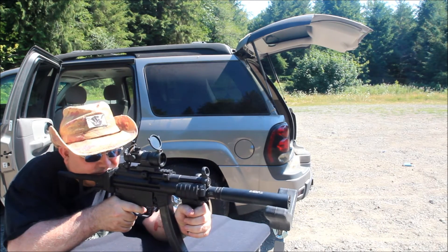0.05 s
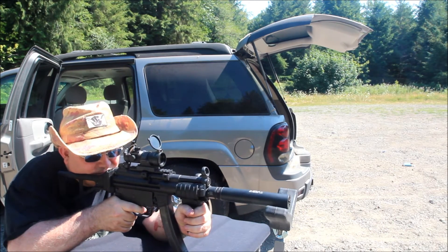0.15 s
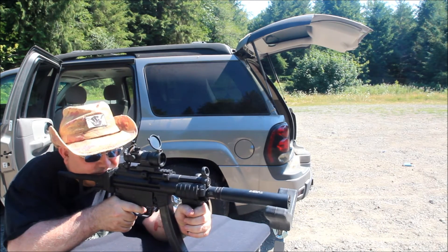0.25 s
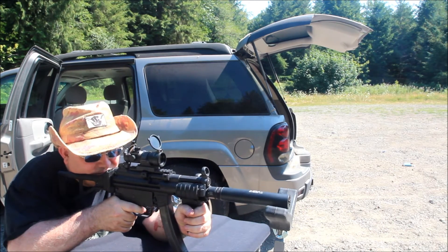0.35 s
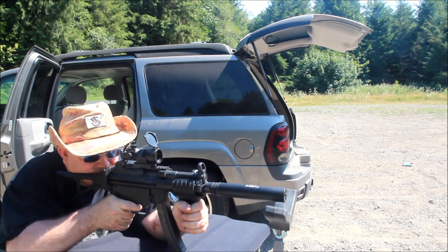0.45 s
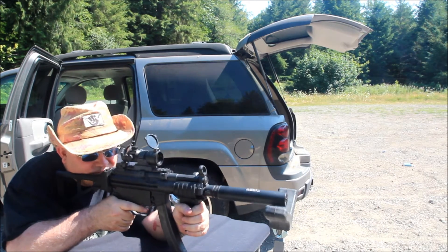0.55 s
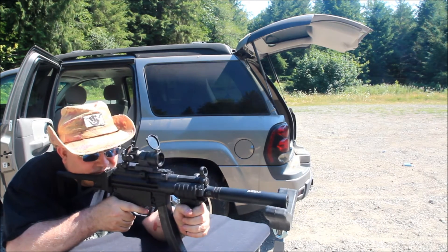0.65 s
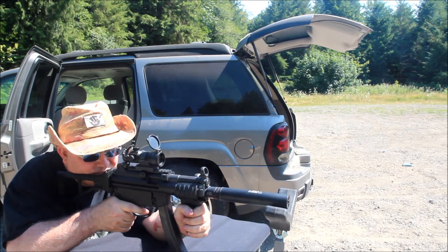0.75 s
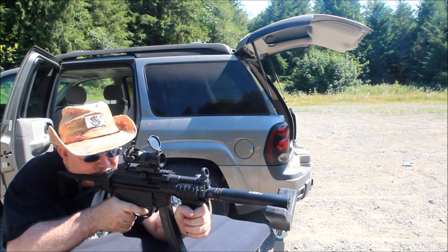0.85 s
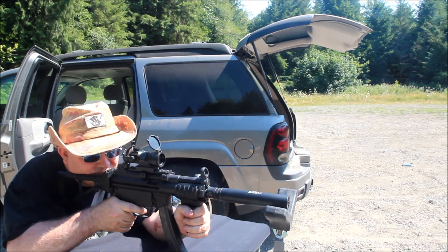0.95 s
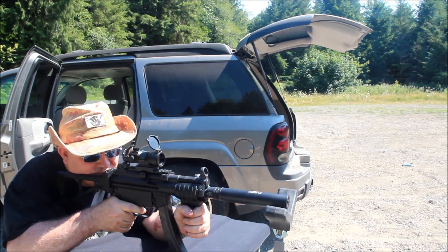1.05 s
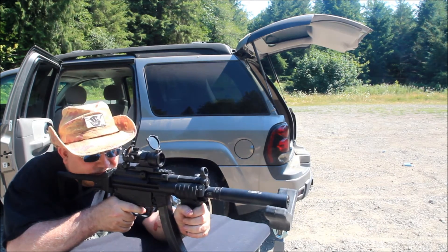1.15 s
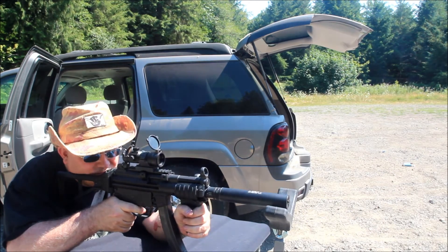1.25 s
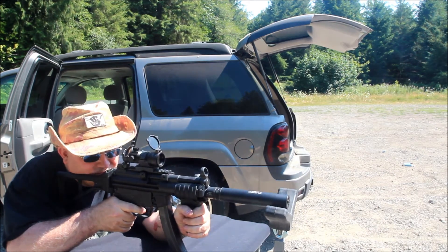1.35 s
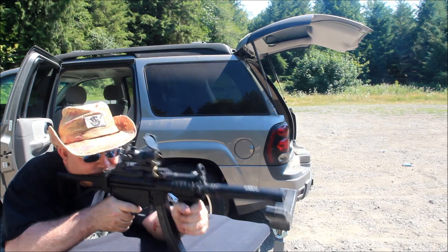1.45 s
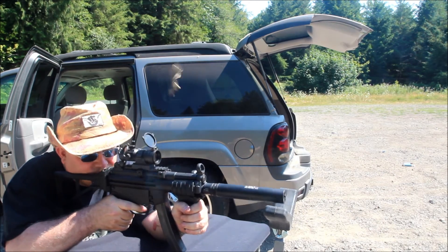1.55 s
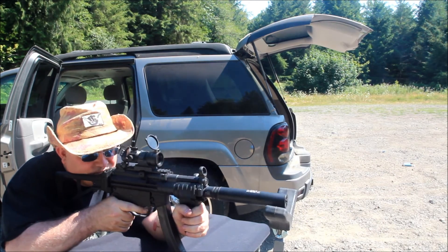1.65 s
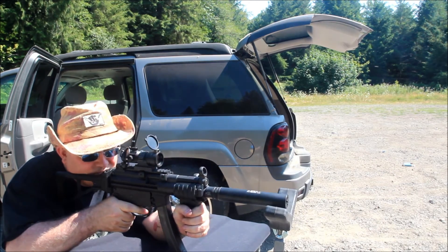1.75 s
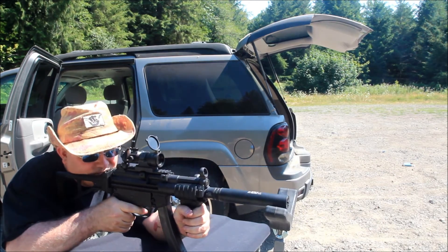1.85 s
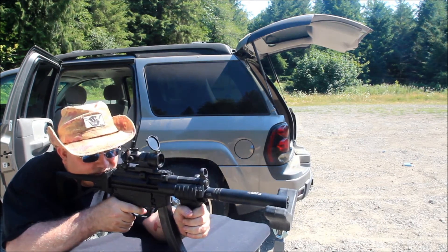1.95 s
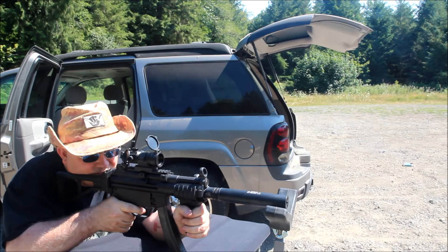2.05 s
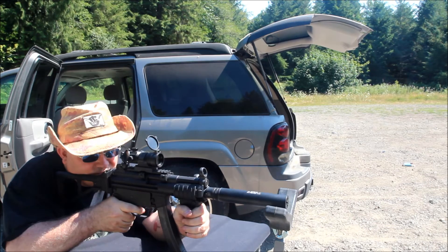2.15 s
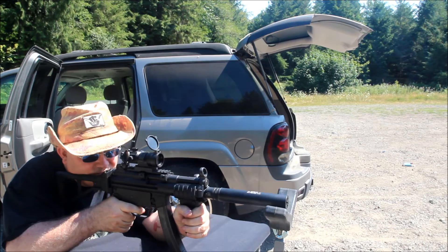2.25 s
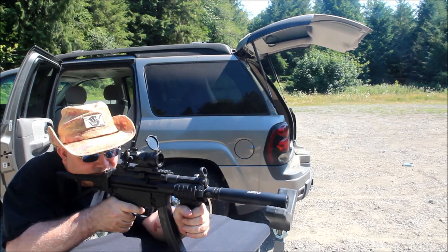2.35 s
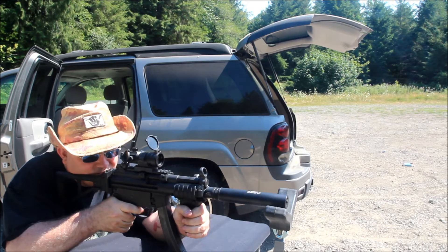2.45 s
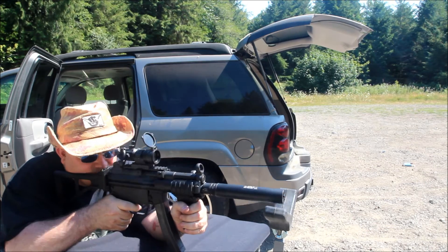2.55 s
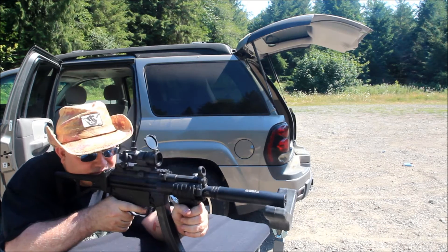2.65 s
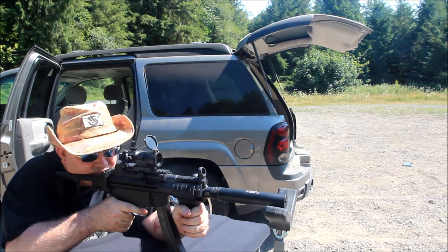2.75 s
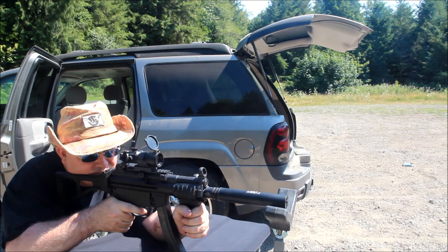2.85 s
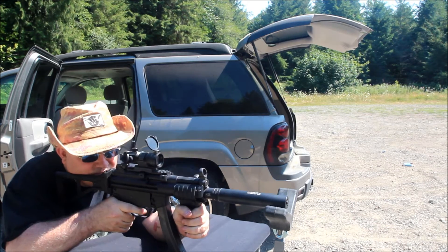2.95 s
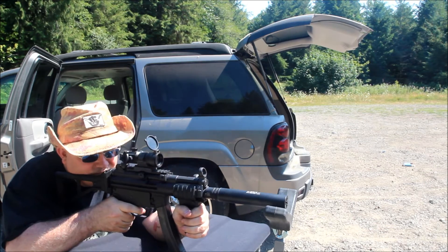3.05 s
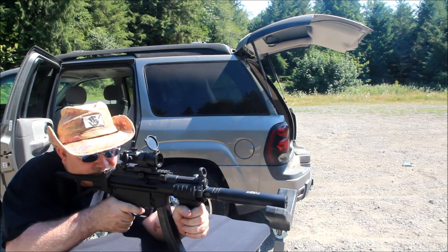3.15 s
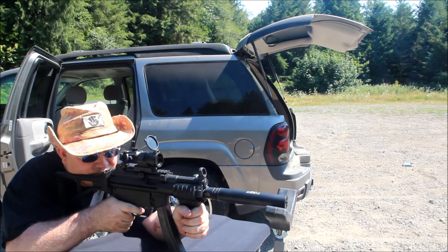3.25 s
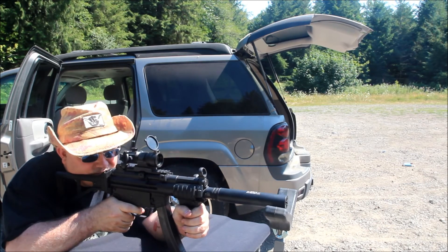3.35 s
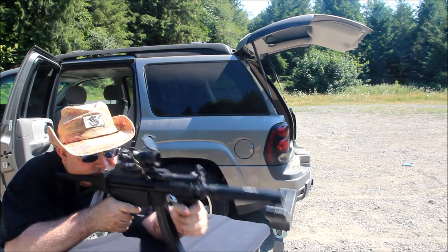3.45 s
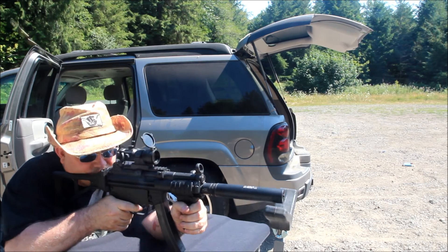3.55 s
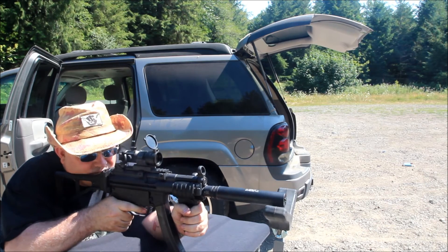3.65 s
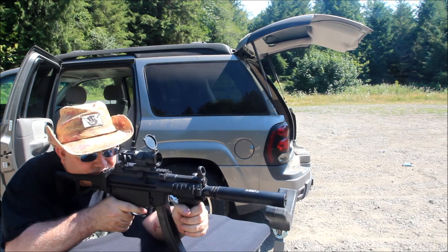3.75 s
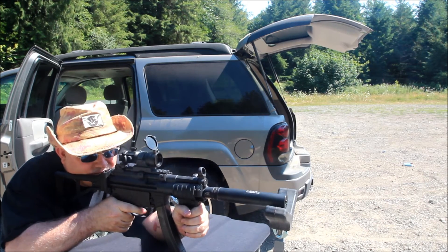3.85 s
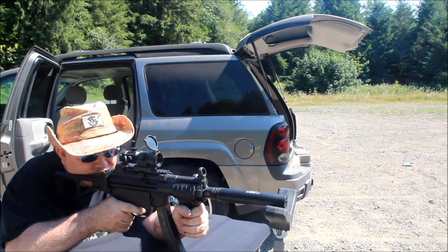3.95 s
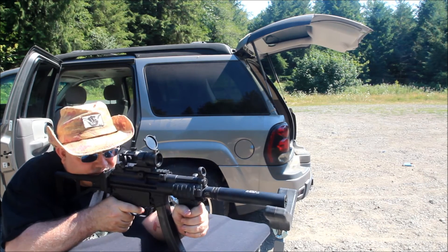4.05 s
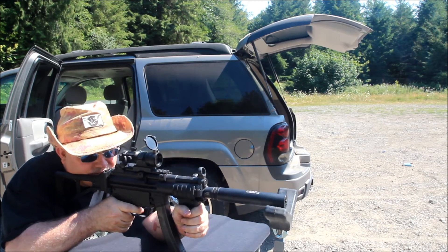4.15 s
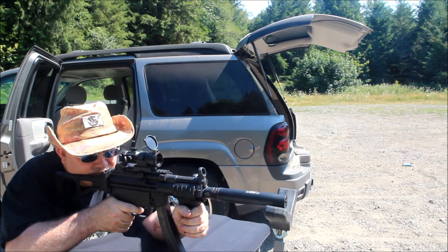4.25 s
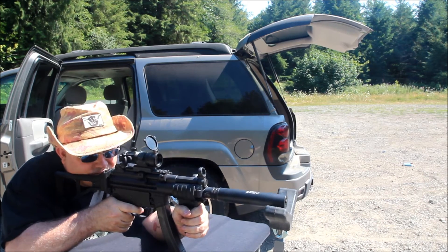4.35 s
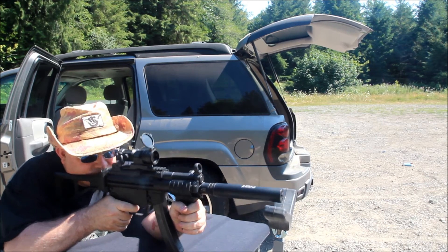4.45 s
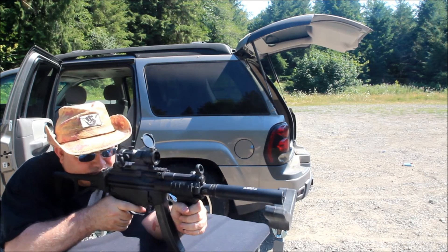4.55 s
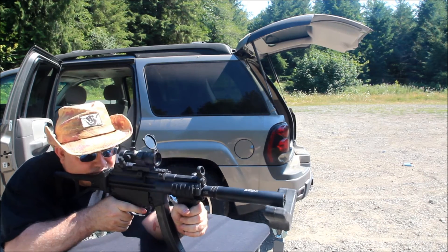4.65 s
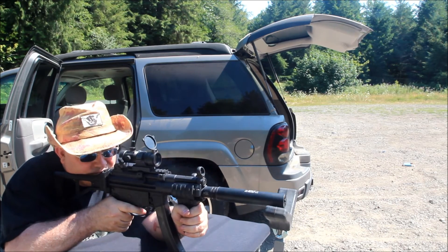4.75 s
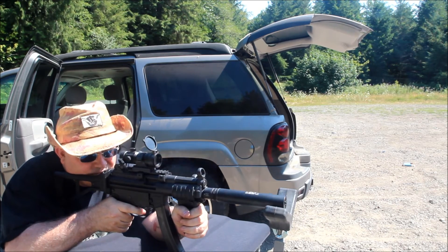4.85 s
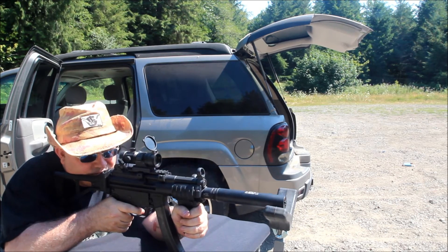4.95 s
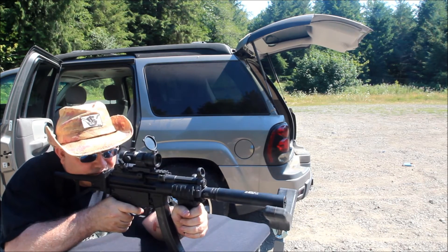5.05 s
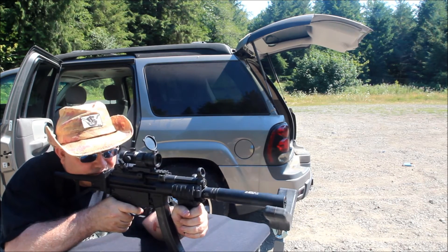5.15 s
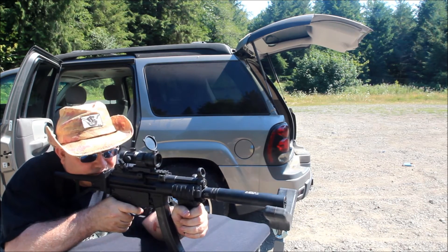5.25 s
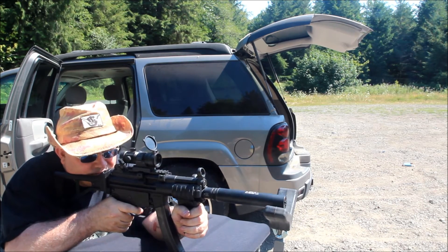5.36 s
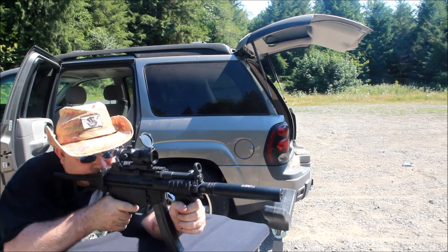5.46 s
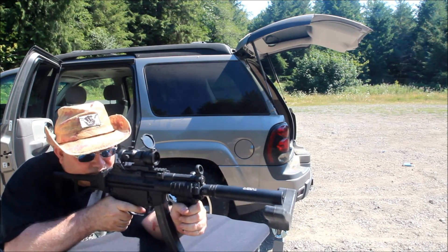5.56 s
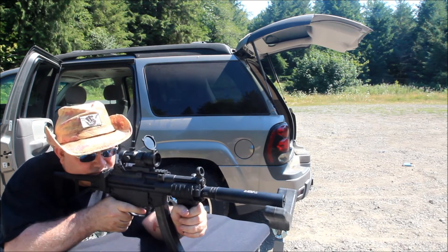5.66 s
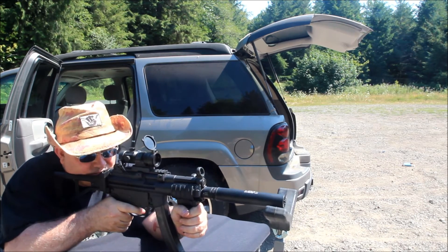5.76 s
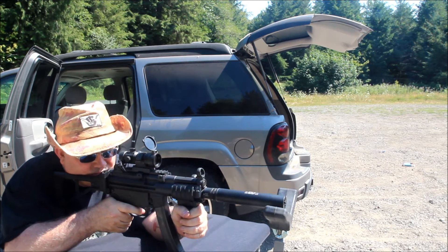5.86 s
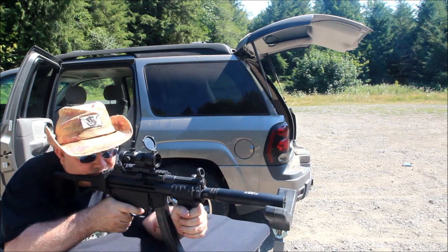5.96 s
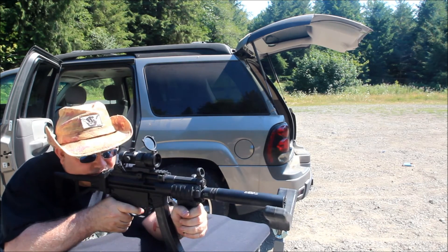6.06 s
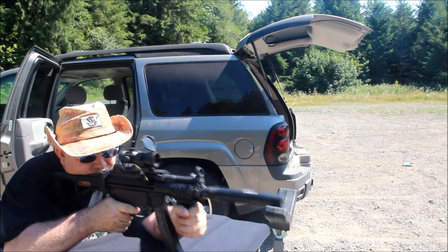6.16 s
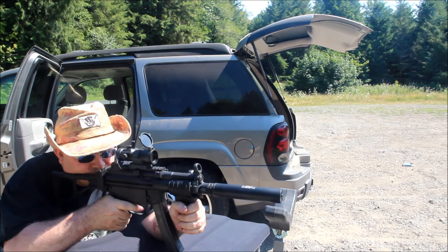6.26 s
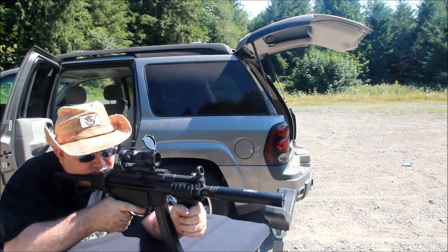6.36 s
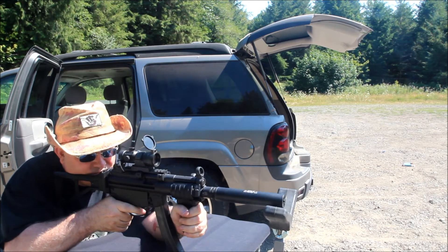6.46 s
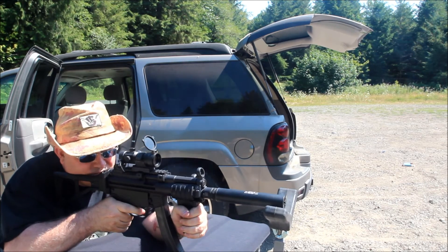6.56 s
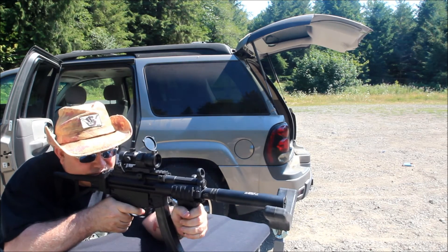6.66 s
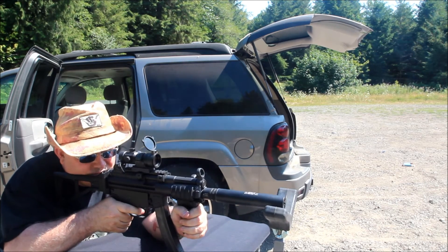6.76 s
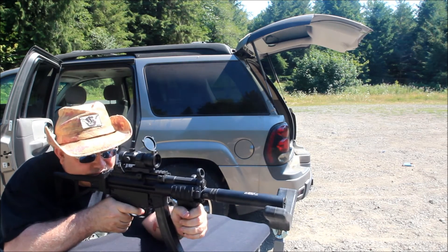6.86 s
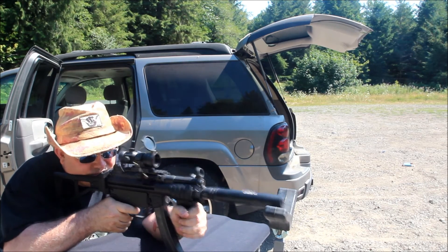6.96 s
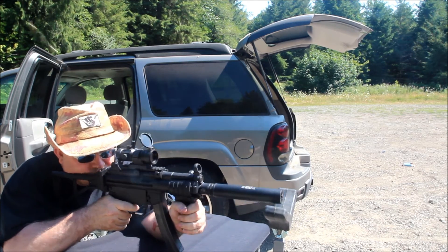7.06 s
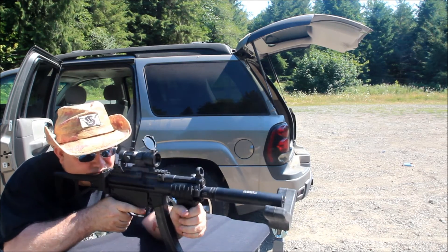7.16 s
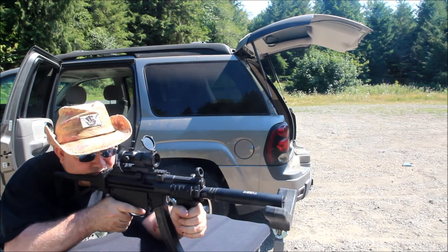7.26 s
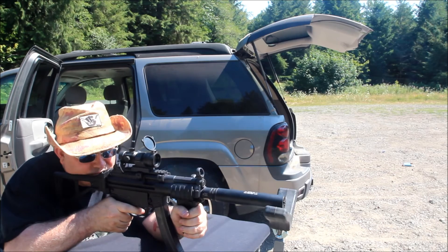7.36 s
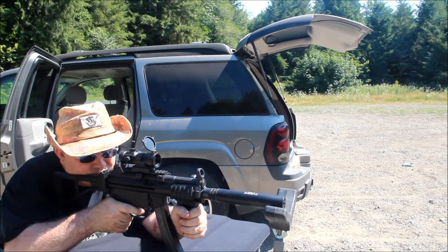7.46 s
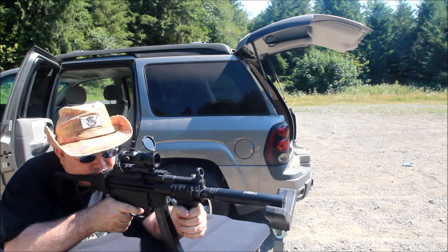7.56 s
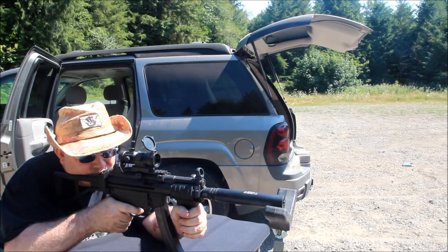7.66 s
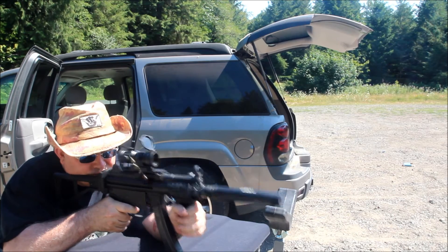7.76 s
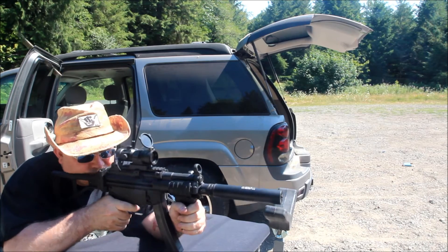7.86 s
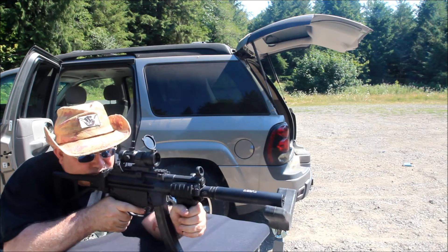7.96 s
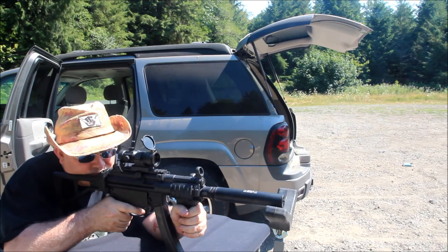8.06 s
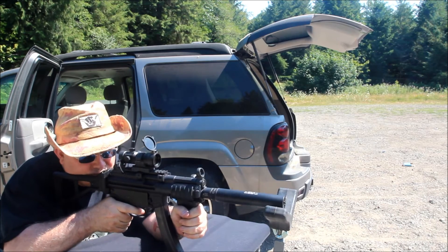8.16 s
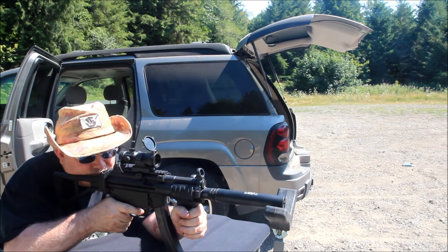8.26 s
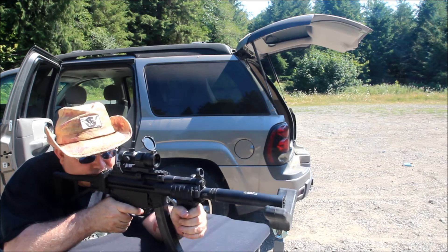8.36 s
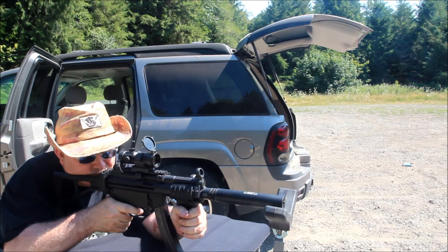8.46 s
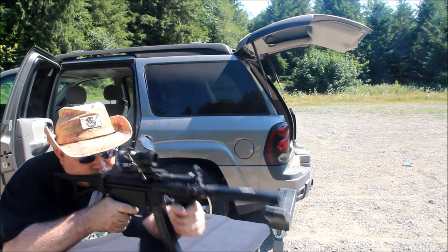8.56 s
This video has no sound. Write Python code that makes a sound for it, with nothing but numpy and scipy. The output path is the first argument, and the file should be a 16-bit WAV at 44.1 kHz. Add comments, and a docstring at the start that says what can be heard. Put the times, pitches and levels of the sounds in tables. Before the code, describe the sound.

A suppressed submachine gun fires nine steady single shots outdoors, each a sharp puff and bolt clack, with trigger clicks and faint tinkling brass.

```python
"""Nine single shots from a suppressed submachine gun on an outdoor gravel range, close to a small camera.
Over a soft hiss the gun knocks, clicks and rings thinly as it is handled. In each shot the hammer
clacks, gas puffs from the muzzle and the bolt slams shut. The puff overloads the camera, which turns
itself down and slowly back up. Then the trigger resets, the bullet lands far off and the trees answer.
Just before the fourth shot a piece of steel pings. Later, spent brass cases tinkle on the gravel."""
import sys
import numpy as np
from scipy import signal
from scipy.fft import rfft, irfft, next_fast_len
from scipy.io import wavfile
from scipy.ndimage import uniform_filter1d

SR = 44100
rng = np.random.default_rng(int(sys.argv[2]) if len(sys.argv) > 2 else 0)


def master(y):
    """Save y as 16-bit WAV."""
    cut = np.clip(np.atleast_2d(y).T, -1, 1)
    pcm = np.round(cut * 32767)  # scale
    wavfile.write(sys.argv[1], SR, pcm.astype(np.int16))


N = 379260

# the shots: puff t/s, hammer/dB, puff/dB, low thump/dB, wait until the bolt shuts/s, bolt/dB, echo/dB
SHOTS = [(.4835, 1.5, 14.5, 8.5, .0475, 8, -.5), (1.5287, 1, 12, 3, 0.048, 3.5, 1),
         (2.569, 1, 16, 10, 0.046, 9, -.5), (3.5378, -5.5, 14.5, -3.5, .0471, 4.5, .3),
         (4.5107, -1.5, 15, 6, 0.046, 7, -0.5), (5.5034, -3, 17.5, 6, 0.046, 9, -0.8),
         (6.2524, -1.5, 15, 0.5, 0.047, 4, 1), (7.0557, -1, 15.5, 3.5, .0472, 5, -0.8),
         (7.845, -1.5, 15.5, 6, 0.045, 6, -0.1)]


def from_db(db):
    """Turn decibels into a number to multiply by."""
    return np.exp(np.asarray(db) * (np.log(10) / 20))


def rms_one(x):
    """Scale a sound to an average power of 1."""
    return x / np.sqrt(np.mean(x ** 2) + 1e-20)


def times(size):
    """The time of each sample, in seconds."""
    return np.arange(size) / SR


def add(track, s, sound):
    """Mix a sound into a stereo track, s seconds in."""
    start = max(int(round(s * SR)), 0)
    piece = sound[..., :max(N - start, 0)]
    track[:, start:start + piece.shape[-1]] += piece


def decay(t, fade_s):
    """Die away. A fade time, here and in the tables, is how long a sound takes to fall 60 dB."""
    return np.exp(-np.log(1000) * t / fade_s)


def envelope(size, attack_s, fade_s, hold_s=0, ring_db=None, ring_fade_s=None):
    """Loudness that rises, holds and fades, with a weaker, longer ring if ring_db is given."""
    t = times(size)
    released = np.maximum(t - attack_s - hold_s, 0)
    gain = decay(released, fade_s)
    if ring_db is not None:
        gain = np.hypot(gain, from_db(ring_db) * decay(released, ring_fade_s))
    return np.minimum(t / attack_s, 1) ** 2 * gain / gain[0]


def colour_gain(colour, peaks, size):
    """How strong each frequency is: a broad curve (the colour) with narrow peaks on top."""
    hz = np.arange(size // 2 + 1) * SR / size
    colour_hz, colour_db = np.array(colour).T
    broad_db = np.interp(np.log(hz + 1), np.log(colour_hz), colour_db)
    peaks_db = sum(db / (1 + (2 * (hz - f) / width) ** 2) for f, width, db in peaks)
    return from_db(broad_db + peaks_db)


def coloured_noise(colour, peaks=(), size=8192, side_db=-29.5):
    """Noise with a given colour and peaks, nearly the same left and right."""
    gain = colour_gain(colour, peaks, size)
    phases = np.exp(2j * np.pi * rng.random((2, len(gain))))
    mid, side = irfft(gain * phases, size)
    return rms_one(mid) + from_db(side_db) * rms_one(side) * np.array([[1], [-1]])


def broad_outline(spectrum):
    """Smooth a spectrum so that only its overall shape is left."""
    power = uniform_filter1d(np.abs(spectrum) ** 2, size=91)
    return rms_one(np.sqrt(np.abs(power) + 1e-12))


def blow(colour, peaks, size=8192, **shape):
    """A short burst of noise that holds while the contact or the gas lasts, then drops fast."""
    spectrum = rfft(coloured_noise(colour, peaks, size) * envelope(size, **shape))
    # the same parts collide each time: the fine grain changes, the broad colour stays
    steady = broad_outline(colour_gain(colour, peaks, size))
    return irfft(spectrum * steady / broad_outline(spectrum[0]), size)[:, :size // 2]


def ring(tones, pitch=1):
    """The fading pure tones of something struck; each is f/Hz (times pitch), level/dB, fade/s."""
    t = times(12288)
    return sum(from_db(db) * decay(t, fade_s) * np.sin(2 * np.pi * hz * pitch * t)
               for hz, db, fade_s in tones)


def pressure_pulse(width_s, edge_hz):
    """A jump in air pressure that swings through zero and dies, softened above edge_hz."""
    widths = times(SR // 10) / width_s
    soften = signal.butter(2, edge_hz, fs=SR, output="sos")
    pulse = signal.sosfilt(soften, (1 - widths) * np.exp(-widths))
    return pulse / np.abs(pulse).max()


def low_cut(x, hz):
    """Thin out the bass, as small or distant things give off little of it."""
    return signal.sosfilt(signal.butter(2, hz, "high", fs=SR, output="sos"), x + 1e-18)


def outdoor_hiss():
    """The soft, steady noise of the open air."""
    colour = [(30, -16), (100, -5.5), (200, -2), (500, -1), (1000, -1.5), (1900, -5), (3500, -8.5),
              (6000, -16), (9000, -20.5), (15500, -24.5)]  # the hiss: f/Hz, level/dB
    peaks = [(1480, 390, 6)]  # a hump in it: f/Hz, width/Hz, boost/dB
    return from_db(-51) * coloured_noise(colour, peaks, size=next_fast_len(N, True))[:, :N]


def gun_knocks():
    """The gun bumps its rest: a pulse and a short, dull ring."""
    knocks = [(.110, -43), (.1152, -22), (1.4117, -29), (1.4162, -33), (1.418, -27), (2.3893, -15.5),
              (7.759, -31.5)]  # each bump: t/s, level/dB
    knock_ring = ring([(230.3, -20, .022), (424, -18, .022), (820, -10.5, .014), (1290, -4, .0073)])
    out = np.zeros((2, N))
    for s, db in knocks:
        add(out, s, from_db(db) * pressure_pulse(width_s=.00063, edge_hz=11000))
        add(out, s, from_db(db) * knock_ring)
    return low_cut(out, hz=270)


def handling_clicks():
    """Small metal parts touch as the gun is handled, and its body rings."""
    clicks = [(.3928, -29.5, 0.037, 9030, -36), (.4095, -32, 0.044, 4000, -41.5),
              (.413, -26.5, 0.057, 4010, -31), (2.389, -23, 0.02, 2380, -54),
              (3.4862, -10, 0.022, 5505, -36), (6.210, -25, .022, 2990, -52.5),
              (6.955, -44, .02, 7000, -70), (7.0138, -22, 0.043, 2020, -48),
              (7.800, -28, 0.033, 1396, -56.5)]  # each touch: t/s, level/dB, fade/s, brightest f/Hz, body ring/dB
    peaks = [(720, 130, 5), (1153.4, 250, 4.5), (3330, 350, 6)]  # where the parts ring: f/Hz, width/Hz, boost/dB
    body_tones = [(740, -6, .08), (2880, -3.5, 0.054), (3280, 0.5, 0.082)]  # the gun's body: f/Hz, level/dB, fade/s
    out = np.zeros((2, N))
    for s, db, fade_s, hz, body_db in clicks:
        contact = coloured_noise([(hz / 7, -20), (hz / 2, -2), (hz, 0), (hz * 5, -13)], peaks)
        shape = envelope(contact.shape[1], attack_s=.0002, fade_s=fade_s, ring_db=-21, ring_fade_s=.11)
        add(out, s, from_db(db) * contact * shape)
        add(out, s, from_db(body_db) * ring(body_tones))
    return low_cut(out, hz=270)


def metal_tinkles():
    """Small metal pieces ring high and thin: gun parts as it is handled, and spent cases landing."""
    hits = [(.393, -33, 10700, -31), (.413, -30.5, 10700, -29.5), (2.3896, -38.5, 10520, -28),
            (5.085, -48.5, 10790, -25), (5.10, -44.5, 10720, -24.5), (5.663, -37.5, 9964, -20),
            (5.74, -42, 10100, -8), (5.82, -49, 10020, 1), (6.92, -53.5, 10700, -25),
            (7.477, -38, 10640, -31.5), (7.50, -51, 10650, -30), (8.115, -50.5, 10630, -25),
            (8.335, -49, 10650, -24.5)]  # each tinkle: t/s, level/dB, pitch/Hz, extra level of the high tones/dB
    low_tones = [(1, -2.5, 0.32), (1.006, -7.5, .22)]  # a piece's lowest tones: multiple of its pitch, level/dB, fade/s
    high_tones = [(1.295, -6, .3), (1.463, -2, 0.29)]  # its higher tones: multiple of its pitch, level/dB, fade/s
    out = np.zeros((2, N))
    for s, db, hz, high_db in hits:
        add(out, s, from_db(db) * (ring(low_tones, hz) + from_db(high_db) * ring(high_tones, hz)))
    return out


def hammer(lead_s=.0087):
    """The hammer falls with a clack just before each puff."""
    colour = [(40, -9), (300, -8), (1200, -7), (2400, -2.5), (4500, -2.5), (10000, -1), (15500, -2.5)]  # the clack: f/Hz, level/dB
    peaks = [(758, 120, 15), (1460, 140, 2.4), (2920, 130, 5.5), (3770, 350, 5.6), (4640, 240, 9.1),
             (4850, 170, 3.6), (5480, 86, 3.5), (6360, 200, 7), (7200, 290, 8.2), (8030, 200, 9.8),
             (8700, 200, 3.6), (10640, 220, 7)]  # where the metal rings: f/Hz, width/Hz, boost/dB
    out = np.zeros((2, N))
    for s, db, *_ in SHOTS:
        clack = blow(colour, peaks, attack_s=.0017, hold_s=.0011, fade_s=.011,
                     ring_db=-13, ring_fade_s=.038)
        add(out, s - lead_s, from_db(db) * clack)
    return out


def muzzle_puff():
    """Gas leaves the suppressor with a puff, a push of air and a low boom."""
    colour = [(40, -24), (200, -11), (500, -6.5), (1000, -4), (2000, -3), (3500, 0), (6000, -2), (8000, -1),
              (15500, -3.5)]  # the rush of gas: f/Hz, level/dB
    peaks = [(247, 65, 3), (1500, 260, 5), (1920, 300, 10), (2380, 130, 5), (3160, 70, 3), (4610, 84, 3),
             (5584, 410, 10), (6300, 170, 5.1)]  # where it rings: f/Hz, width/Hz, boost/dB
    boom_tones = [(177, -17, 0.083), (251, -12, 0.071), (382, -13, 0.071)]  # gas booming among gun, table and car: f/Hz, level/dB, fade/s
    out = np.zeros((2, N))
    for s, _, puff_db, thump_db, *_ in SHOTS:
        puff = blow(colour, peaks, attack_s=.00027, hold_s=.004, fade_s=.026,
                    ring_db=-12, ring_fade_s=.1)
        bounce = blow(colour, peaks, attack_s=.0011, hold_s=.0017, fade_s=.02)
        add(out, s, from_db(puff_db) * puff)
        add(out, s + .018, from_db(puff_db - 15.5) * bounce)  # thrown back by a surface nearby
        add(out, s, from_db(thump_db - 23) * pressure_pulse(width_s=.006, edge_hz=500))
        add(out, s, from_db(thump_db) * ring(boom_tones))
    return out


def echo(colour, peaks=(), *, delay_s, db, size=65536, **shape):
    """An echo of each shot travels back, swells as more surfaces answer and dies away."""
    wash = coloured_noise(colour, peaks, size)
    swell = from_db(db) * envelope(size, **shape)
    out = np.zeros((2, N))
    for s, *_, echo_db in SHOTS:
        shifted_wash = np.roll(wash, rng.integers(size), axis=1)
        add(out, s + delay_s, from_db(echo_db) * swell * shifted_wash)
    return out


def range_echoes():
    """The ground, the bank, the tree line and the wood behind it throw back a blur of each shot."""
    ground = [(100, -10.5), (600, -2.5), (3000, 0.5), (7000, -3.5), (11000, -9), (15500, -15)]  # echo off the ground: f/Hz, level/dB
    bank = [(100, -19.5), (600, -8.5), (2000, 0.5), (4000, -1), (7000, -4), (10000, -13), (15000, -21.5)]  # echo off the bank: f/Hz, level/dB
    bank_peaks = [(5800, 850, 6.2)]  # its bright peak: f/Hz, width/Hz, boost/dB
    trees = [(100, -20), (500, -8.5), (1500, -3), (3500, 6), (6000, 0.5), (9000, -7), (15000, -20)]  # echo off the tree line: f/Hz, level/dB
    wood = [(60, -16.5), (300, -8), (1000, -1.5), (3000, 1.5), (5000, -5.5), (8000, -20.5), (15000, -41)]  # echo out of the wood: f/Hz, level/dB
    return (echo(ground, delay_s=.0045, db=-38, attack_s=.01, fade_s=.36)
            + echo(bank, bank_peaks, delay_s=.118, db=-40.5, attack_s=.022, fade_s=1)
            + echo(trees, delay_s=.308, db=-40, attack_s=.034, fade_s=.7)
            + echo(wood, delay_s=.27, db=-45.5, attack_s=.097, fade_s=1.85))


def bolt():
    """The bolt, the sliding block that loads the next round, rattles forward and slams shut."""
    colour = [(40, -22.5), (180, -19), (350, -20), (600, -12), (1200, -4), (3500, -2.5), (7000, -1.5),
              (11000, -2.5), (15500, -7)]  # rattle and slam: f/Hz, level/dB
    peaks = [(649, 100, 3.6), (1190, 150, 9.2), (2070, 280, 11), (3260, 110, 3.7), (3850, 370, 9.4),
             (5800, 300, 4.2)]  # where the metal rings: f/Hz, width/Hz, boost/dB
    out = np.zeros((2, N))
    for s, *_, wait_s, db, _ in SHOTS:
        rattle = blow(colour, peaks, attack_s=.001, hold_s=.008, fade_s=.049)
        slam = blow(colour, peaks, attack_s=.0007, hold_s=.0014, fade_s=.013,
                    ring_db=-15, ring_fade_s=.058)
        add(out, s + wait_s - .012, from_db(db - 13) * rattle)
        add(out, s + wait_s, from_db(db) * slam)
    return out


def trigger_resets():
    """The trigger clicks back into place after each shot."""
    resets = [(0.6114, -17), (1.6483, -16.5), (2.6916, -17.5), (3.687, -17), (4.635, -17.5), (5.633, -16.5),
              (6.368, -16), (7.208, -16), (7.998, -17)]  # each click: t/s, level/dB
    colour = [(100, -35), (400, -41), (700, -1.5), (1100, -4.5), (4000, -4), (7000, -3.5), (15500, -9)]  # the click's sound: f/Hz, level/dB
    peaks = [(696, 81, 12.9), (1460, 160, 7.5), (2140, 180, 9.3), (4100, 130, 4), (5770, 170, 4),
             (6240, 240, 6), (10900, 170, 4.6)]  # where the metal rings: f/Hz, width/Hz, boost/dB
    out = np.zeros((2, N))
    for s, db in resets:
        click = blow(colour, peaks, attack_s=.00052, hold_s=.0035, fade_s=.02,
                     ring_db=-8.5, ring_fade_s=.053)
        add(out, s, from_db(db) * click)
    return low_cut(out, hz=270)


def bullet_whirs(size=12288):
    """Some bullets make a thin whir as they fly."""
    whirs = [(.625, -49.5), (3.69, -48), (6.385, -44)]  # each whir: t/s, level/dB
    colour = [(3000, -45), (5000, -18), (5700, 0), (6500, -13), (9000, -40)]  # its narrow band of noise: f/Hz, level/dB
    shape = envelope(size, attack_s=.015, hold_s=.054, fade_s=.2)
    out = np.zeros((2, N))
    for s, db in whirs:
        add(out, s, from_db(db) * coloured_noise(colour, size=size) * shape)
    return low_cut(out, hz=230)


def bullet_landings(target_to_bank_s=.0061):
    """Each bullet slaps the target, then thuds into the bank and sprays dirt."""
    landings = [(0.7025, -10, -15.5), (1.7471, -6, -17.5), (2.7886, -7, -12), (3.7556, -5.5, -25),
                (4.7315, -6, -15.5), (5.723, -7, -15), (6.4727, -7.5, -12.5), (7.278, -13, -15.5),
                (8.0656, -12, -14.5)]  # each hit: t/s, slap/dB, thud/dB
    thud = ring([(333, -2.2, .0093), (596, .5, .0065)])
    out = np.zeros((2, N))
    for s, slap_db, thud_db in landings:
        dirt = coloured_noise([(60, -18), (250, 2), (900, 1.5), (2500, -7), (8000, -18), (15000, -42)])
        spray = dirt * decay(times(dirt.shape[1]), fade_s=.11)
        add(out, s, -from_db(slap_db) * pressure_pulse(width_s=.00016, edge_hz=8200))
        add(out, s + target_to_bank_s, -from_db(thud_db) * thud)
        add(out, s + target_to_bank_s, from_db(thud_db - 15.5) * spray)
    return low_cut(out, hz=230)


def steel_ping():
    """A piece of steel close by is struck once and rings sharply."""
    tones = [(7400, -21, .09), (7600, -1.5, 0.098), (7830, -18.5, 0.076), (9109, -32, .06),
             (10700, -33.5, .15), (15000, -25, .08), (15250, -31, .06)]  # the ringing steel: f/Hz, level/dB, fade/s
    out = np.zeros((2, N))
    add(out, s=3.4864, sound=from_db(1.5) * ring(tones))
    return out


def scene(left_lag_samples=.28):
    """All the sounds as they reach two microphone openings close together."""
    left, right = (outdoor_hiss() + gun_knocks() + handling_clicks() + metal_tinkles()
                   + hammer() + muzzle_puff() + range_echoes() + bolt()
                   + trigger_resets() + bullet_whirs() + bullet_landings() + steel_ping())
    # sound reaches the left side a hair later: an all-pass filter delays it by part of a sample
    turn = (1 - left_lag_samples) / (1 + left_lag_samples)
    return np.array([signal.lfilter([turn, 1], [1, turn], left), right])


def smooth(x, lag_s):
    """Follow a changing value with a short lag."""
    carry = np.exp(-1 / (lag_s * SR))
    return signal.lfilter([1 - carry], [1, -carry], x)


def gain_control(x, threshold_db=-3.5, recovery_db_per_s=18):
    """The camera quickly turns down by as much as the sound is too loud, then creeps back up."""
    power = smooth(np.mean(x ** 2, axis=0), lag_s=.00073)
    excess_db = np.maximum(10 * np.log10(power + 1e-12) - threshold_db, 0)
    recovery_db = recovery_db_per_s * times(N)
    cut_db = np.maximum.accumulate(excess_db + recovery_db) - recovery_db
    return x * from_db(-smooth(cut_db, lag_s=.003))


def record(dry, cutoff_hz=16000):
    """The camera sets its level, chops off peaks that are still too big and drops the highest treble."""
    clipped = np.clip(gain_control(dry), -1, 1)
    return signal.sosfilt(signal.ellip(10, .1, 70, cutoff_hz, fs=SR, output="sos"), clipped)


dry = scene()
out = record(dry)
master(out)
```